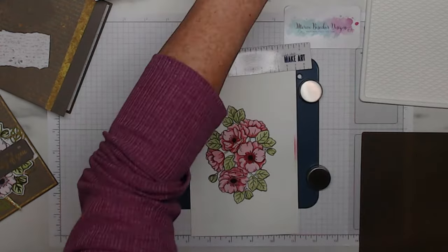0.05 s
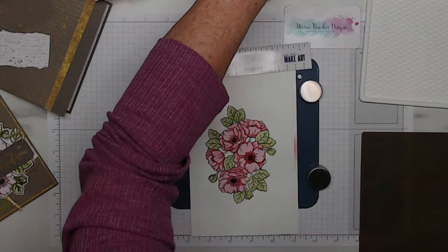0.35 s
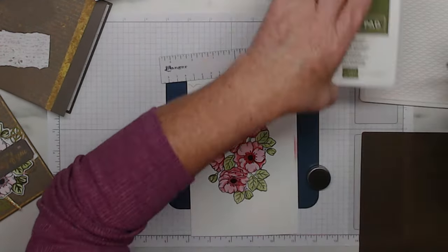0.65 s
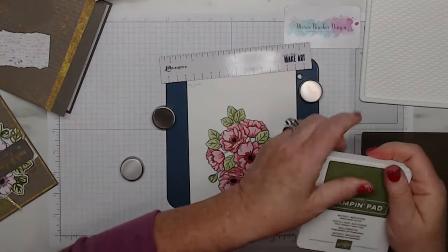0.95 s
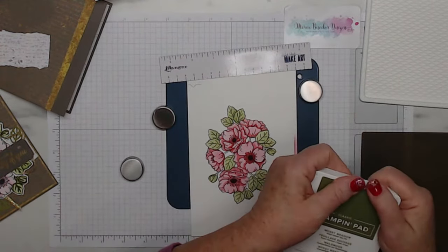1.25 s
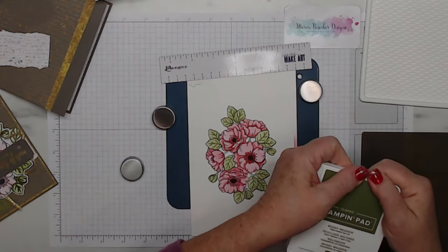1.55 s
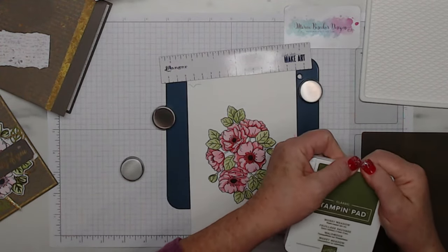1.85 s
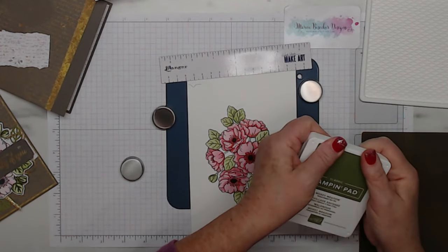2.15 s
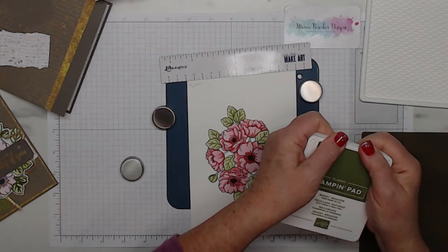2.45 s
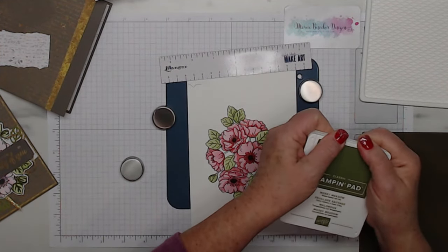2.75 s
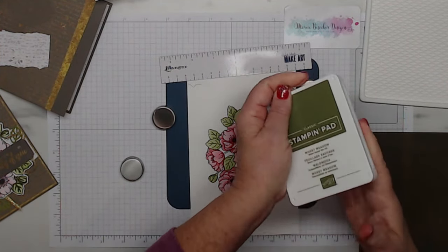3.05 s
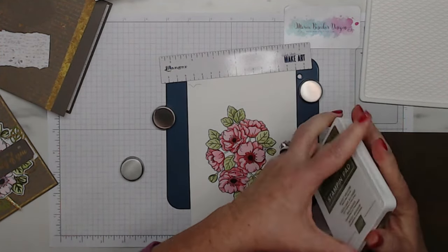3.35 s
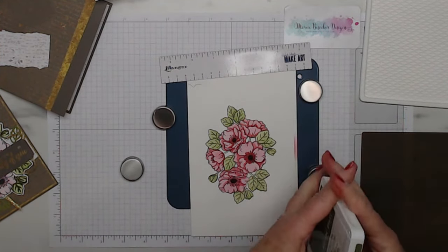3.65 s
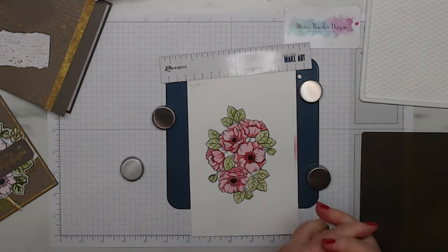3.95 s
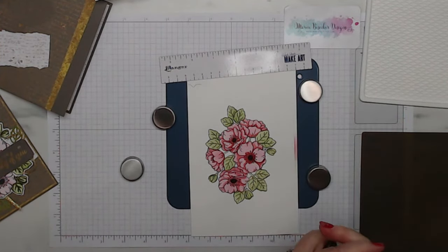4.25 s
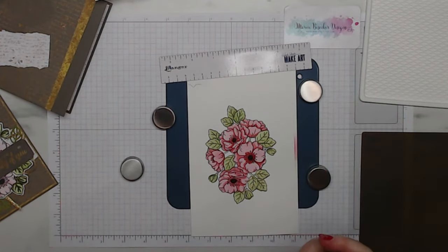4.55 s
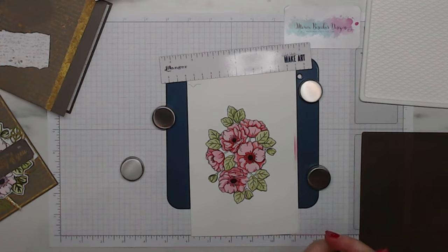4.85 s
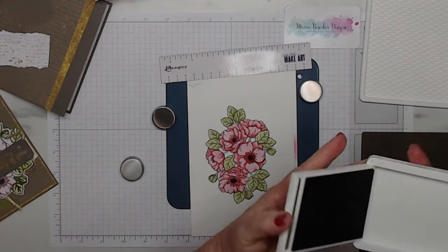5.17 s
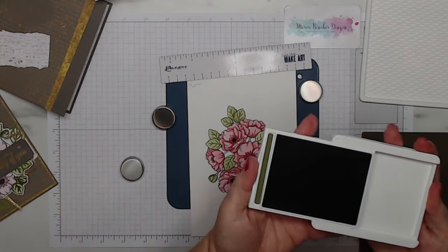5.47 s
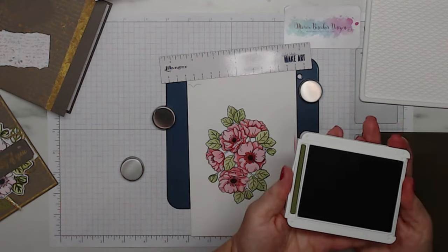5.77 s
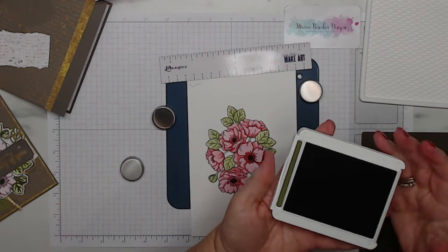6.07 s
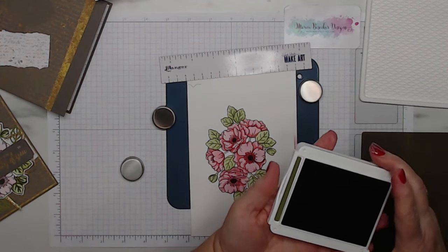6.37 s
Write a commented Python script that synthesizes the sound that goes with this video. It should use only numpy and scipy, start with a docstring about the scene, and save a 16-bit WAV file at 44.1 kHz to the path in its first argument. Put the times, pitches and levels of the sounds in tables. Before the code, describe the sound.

Two magnets clack onto steel, then fingers tap a plastic ink pad case, snap it open and slide its lid.

```python
"""At a craft desk in a small room, two magnets clack down on a steel plate to hold a card.
Fingers tap, brush and prise at a hollow plastic ink pad case. It snaps open and rings briefly,
then its lid scrapes along its grooves to slide under the base. Each knock is a few dying tones
plus a short crack of noise, and the room echoes it. Behind it all are a low hum, faint room
noise and a thin, pulsing electronic whine on the right."""
import sys
import numpy as np
from scipy import signal
from scipy.fft import rfft, irfft, next_fast_len
from scipy.io import wavfile

SR = 44100
rng = np.random.default_rng(int(sys.argv[2]) if len(sys.argv) > 2 else 0)


def pcm_store(signal):
    """Save signal as 16-bit PCM."""
    levels = np.round(np.clip(np.atleast_2d(signal), -1, 1) * 32767)
    wavfile.write(sys.argv[1], SR, levels.astype(np.int16).T)


N = 287091
TIME = np.arange(N) / SR
BLOW_TIME = TIME[:SR // 3]

# steady noises (room rumble, microphone hiss, hiss around the whine): f/Hz, level/dB per Hz
RUMBLE_SPECTRUM = [(20, -99.5), (45, -93), (75, -88), (110, -93), (250, -95), (500, -103), (900, -105),
                   (1400, -113), (4000, -125), (10000, -150)]
MIC_HISS = [(200, -114), (1500, -112), (3500, -113), (5500, -116), (10000, -120), (12000, -126),
            (14800, -128), (16000, -145)]
HIGH_HISS = [(4500, -135), (5700, -115), (6600, -106), (7300, -106), (8100, -102), (8500, -110),
             (9800, -113), (11500, -132)]
# the low hum and four faint higher tones: f/Hz, level/dB, left minus right/dB
STEADY_TONES = [(58.6, -64.5, -0.5), (929, -85.5, -7.5), (4120, -87.5, 12), (6520, -82, -17.5),
                (8190, -79.5, -22)]
# tones that make the whine buzz: multiple of its base pitch, level/dB relative to the main tone
BUZZ_TONES = [(11, -27), (12, -24.5), (13, -13.5), (14, -18), (15, -11.5), (17, -27.5), (18, -20.5),
              (19, -23), (20, -25.5)]
# magnets touch down, slam flat and rock; the first moves the desk less, so it has less bass:
# t/s, level/dB, extra crack/dB, treble cut-off f/Hz, bass cut-off f/Hz
MAGNET_BLOWS = [(0.0378, -21, 2.5, 10600, 200), (0.0551, -12.5, -3.5, 9930, 330),
                (0.067, -27.5, 2, 4000, 200), (0.173, -35.5, -4, 800, 120), (0.2358, -31, 0, 2880, 100),
                (0.2732, -13.5, 8, 12100, 69.5), (0.2761, -15.5, -5.5, 3000, 69.4),
                (0.292, -19, -9.5, 5000, 70), (0.3161, -18.5, 3.5, 6000, 71)]
# tones of the steel plate on the desk: f/Hz, level/dB, t60/s (time to fade 60 dB) before ring_share
PLATE_MODES = [(62, -35, 0.31), (89, -21.5, 0.45), (126, -23, .15), (168, -17, 0.31), (180, -18.5, .22),
               (255, -26.5, 0.17), (342, -22, 0.27), (447, -12.5, 0.053), (470.3, -14, .06),
               (565, -11, 0.081), (677.5, -5, 0.029), (762, -8, 0.1), (915, -8.5, 0.027),
               (1052, -12.5, 0.022), (1252, -18, 0.089), (1570, -25, 0.087), (1700, -20.5, .05)]
# crack of a magnet on steel: f/Hz, level/dB
MAGNET_SPECTRUM = [(100, 4), (400, 3), (1000, 0), (1750, -3), (2400, -6.5), (3700, -4.5), (5000, -8.5),
                   (7500, -11.5), (11000, -22.5), (16000, -38.5)]
# fingers and nails on the case: t/s, level/dB, touched wall's f/Hz, hardness/dB (the crack's gain)
FINGER_TAPS = [(0.828, -49, 960, -10.5), (1.049, -39.5, 850, -13.5), (1.263, -42, 2330, -3.5),
               (1.2965, -42, 350, -10.5), (1.298, -37.5, 730, -16), (1.343, -42.5, 816, -9),
               (1.411, -42.5, 410, -9.5), (1.913, -44.5, 910, -12), (1.963, -36.5, 620, -16),
               (2.094, -42.5, 815, -13.5), (2.223, -45, 830, -13.5), (2.890, -42.5, 864, -12),
               (2.929, -47, 500, -13), (3.0693, -30, 950, -4.5), (3.134, -39.5, 1110, -8.5),
               (3.1965, -37.5, 1140, -4.5), (4.056, -45.5, 458, -18), (4.567, -45.5, 873, -22),
               (5.078, -52, 935, 3.5), (5.0955, -34.5, 590, -9), (5.303, -41.5, 610, -13),
               (5.977, -51, 1023, -4.5)]
# tones of the hollow plastic case: f/Hz, level/dB, t60/s before ring_share
CASE_MODES = [(369, -20, 0.093), (455.5, -4.5, 0.085), (538, -15, 0.12), (586, -10.5, 0.16),
              (642, -8.5, 0.091), (767, 4, 0.027), (888, -4, 0.1), (1015, -16, 0.12), (1237, -8.5, 0.069),
              (1597, -21.5, 0.034), (2207, -21, 0.1)]
# crack of a nail on plastic: f/Hz, level/dB
NAIL_SPECTRUM = [(250, -15), (1000, -4.5), (1600, -2), (2100, 3), (2600, -2.5), (3300, 0.5), (4000, -4),
                 (5000, -2), (8000, -15), (15000, -35)]
# fingertips brushing the plastic: t/s, length/s, level/dB
FINGER_STROKES = [(0.838, 0.032, -66.5), (1.07, 0.016, -70), (1.207, .07, -69), (2.059, .05, -69),
                  (2.365, 0.036, -64.5), (2.94, 0.014, -61), (3.117, .018, -68), (3.205, 0.016, -64),
                  (3.32, 0.036, -78), (5.06, .03, -64), (5.29, .01, -67.5)]
# rustle of skin on plastic: f/Hz, level/dB
SKIN_SPECTRUM = [(250, -2), (600, 0.5), (950, 2), (1500, -2), (2350, -4.5), (3200, -7), (5000, -5),
                 (9000, -10.5), (15000, -30.5)]
# fingertips squeaking or groaning as they slip: t/s, length/s, level/dB, f/Hz
FINGER_SQUEAKS = [(0.837, .08, -74.5, 2450), (1.056, 0.033, -73, 2320), (1.194, 0.1, -68, 2260),
                  (3.32, .025, -80, 12400), (5.01, 0.095, -62, 723), (5.275, .045, -65.5, 621.7)]
# the lid flexes, then jumps its catch: t/s, level/dB, extra crack/dB, treble cut-off f/Hz
SNAP_BLOWS = [(4.7287, -15, -21, 1270), (4.7302, -12, -17.5, 1830), (4.7322, -13, -2, 12900),
              (4.7347, -23, 11, 9830)]
# crack of the opening case: f/Hz, level/dB
SNAP_SPECTRUM = [(400, -16), (1500, -1.5), (2600, -6.5), (3600, 0), (5500, -2.5), (7500, -2.5),
                 (10000, -12.5), (12500, -23.5), (16000, -37)]
# rise and fall of the sliding lid's sound: t/s, level/dB
SLIDE_LEVELS = [(5.468, -72.5), (5.484, -47.5), (5.494, -43.5), (5.506, -54.5), (5.514, -45.5),
                (5.584, -61), (5.716, -53.5), (5.745, -65.5)]
# scrape of plastic on plastic: f/Hz, level/dB
SCRAPE_SPECTRUM = [(300, -16), (600, -2), (850, -9.5), (1500, -11), (2100, -1), (2500, -4), (3100, -2),
                   (4500, -5), (7000, -8), (10000, -19.5), (12500, -27), (15000, -48)]
# how long the room's echoes last: f/Hz, t60/s
ECHO_T60 = [(100, .33), (300, 0.28), (800, 0.28), (3000, .28), (7000, 0.25), (14000, 0.22)]
# tone colour of the echoes: f/Hz, level/dB
ECHO_SPECTRUM = [(80, -9), (250, -2), (600, -0.5), (1200, 0), (3000, -1.5), (7000, -2.5), (14000, -2.5)]
# how the two microphones differ: f/Hz, left minus right/dB
MIC_DIFFERENCE = [(100, -1), (600, .5), (1400, -2), (2800, 4), (5500, 2), (9500, -5)]


def from_db(db):
    """Turn decibels into a gain to multiply by."""
    return 10 ** (np.asarray(db) / 20)


def rms_one(x):
    """Scale a signal so its average strength (rms) is 1."""
    return x / np.sqrt(np.mean(x ** 2) + 1e-20)


def at_hz(points, hz):
    """Read between a table's rows, giving each octave equal room."""
    f, value = np.transpose(points)
    return np.interp(np.log(np.maximum(hz, 1)), np.log(f), value)


def pan(db):
    """Left and right gains; positive db leans left."""
    return from_db(np.array([[.5], [-.5]]) * db)


def colour(x, spectrum):
    """Turn each frequency up or down as a table says."""
    n = x.shape[-1]
    size = next_fast_len(n)
    gain = from_db(at_hz(spectrum, np.fft.rfftfreq(size, 1 / SR)))
    return irfft(rfft(x, size) * gain, size)[..., :n]


def lowpass(x, hz):
    """Take away treble, as a soft contact does."""
    return signal.sosfilt(signal.butter(2, min(hz, .45 * SR), fs=SR, output="sos"), x)


def highpass(x, hz):
    """Take away bass; small objects give off little of it."""
    return signal.sosfilt(signal.butter(2, hz, "high", fs=SR, output="sos"), x)


def add(out, s, sound):
    """Mix a sound in, starting at s seconds."""
    i = round(s * SR)
    out[:, i:i + sound.shape[-1]] += sound[..., :N - i]


def background(width=.6, wide_above_hz=110):
    """Room rumble that widens above the bass, hiss (stronger on the right), hum and faint tones."""
    white = rng.standard_normal((5, N)) * np.sqrt(SR / 2)
    side = width * highpass(white[4], wide_above_hz) * [[1], [-1]]
    rumble = colour(white[0] + side, RUMBLE_SPECTRUM) * pan(db=-2)
    hiss = colour(white[1:3], MIC_HISS) + colour(white[3], HIGH_HISS) * [[0], [1]]
    tones = sum(np.sqrt(2) * from_db(db) * np.sin(2 * np.pi * hz * TIME) * pan(side_db)
                for hz, db, side_db in STEADY_TONES)
    return rumble + hiss + tones


def whine(base_hz=500, main_multiple=16, bursts_per_s=30, burst_s=.0136, start_s=.0191):
    """Electronic interference comes in quick bursts and turns buzzier partway through."""
    is_on = (TIME - start_s) % (1 / bursts_per_s) < burst_s
    gate = lowpass(1. * is_on, hz=1500)
    phase = 2 * np.pi * base_hz * TIME
    buzz = sum(from_db(db) * np.sin(round(k) * phase + 2 * np.pi * rng.random()) for k, db in BUZZ_TONES)
    buzz_gain = from_db(np.interp(TIME, [2.46, 2.84], [-13, 0]))
    tone = np.sin(main_multiple * phase) + buzz_gain * buzz
    return from_db(-67) * np.sqrt(2) * gate * tone * pan(db=-21)


def ring(hz, t60):
    """One mode: a tone that a struck object makes, fading 60 dB in t60 seconds."""
    return np.sin(2 * np.pi * hz * BLOW_TIME) * from_db(-60 * BLOW_TIME / t60)


def body(modes, ring_share, scatter_db):
    """All of an object's modes; each blow lands on another spot and mixes them anew."""
    # neighbouring modes start in opposite directions, so the ring swells over a few cycles
    return sum((-1) ** k * from_db(db + scatter_db * rng.normal()) * ring(hz, t60 * ring_share)
               for k, (hz, db, t60) in enumerate(modes))


def crack(spectrum, t60, width):
    """Crowded high modes blur into noise that dies fast; its treble differs at each microphone."""
    mid, side = colour(rng.standard_normal((2, len(BLOW_TIME))), spectrum)
    noise = mid + width * highpass(side, hz=900) * [[1], [-1]]
    return rms_one(noise) * from_db(-60 * BLOW_TIME / t60)


def magnets(right_lag_s=.00008):
    """Each magnet is pulled onto the plate and rocks before it lies flat."""
    out = np.zeros((2, N))
    for s, db, crack_db, contact_hz, bass_hz in MAGNET_BLOWS:
        plate = from_db(-3) * body(PLATE_MODES, ring_share=.57, scatter_db=5.5)
        click = from_db(crack_db - 5) * crack(MAGNET_SPECTRUM, t60=.025, width=.65)
        add(out, s, from_db(db) * highpass(lowpass(plate + click, contact_hz), bass_hz))
    return np.array([out[0], np.interp(TIME - right_lag_s, TIME, out[1])])


def touches(events, wall_cycles=7.5, overtone_ratio=3.55):
    """Each touched wall flexes for a few cycles, while the grip muffles the rest of the case."""
    out = np.zeros((2, N))
    for s, db, wall_hz, hardness_db in events:
        t60 = wall_cycles / wall_hz
        wall = from_db(1.5) * ring(wall_hz, t60)
        case = from_db(-11) * body(CASE_MODES, ring_share=.29, scatter_db=1.5)
        overtone = from_db(-5) * ring(overtone_ratio * wall_hz, t60)
        click = from_db(hardness_db) * (crack(NAIL_SPECTRUM, t60=.02, width=.34) + overtone)
        contact_hz = 6200 * 2 ** (hardness_db / 10)   # a harder touch is shorter, so brighter
        add(out, s, from_db(db) * lowpass(wall + case + click, contact_hz))
    return highpass(out, hz=270)


def taps(from_s=.65, to_s=4.6, ticks_per_s=3, tick_db=-53, tick_hz=800, hardness_db=-19):
    """Fingers and nails tap the case, and the prising grip adds faint random ticks."""
    span_s = to_s - from_s
    ticks = [(from_s + when * span_s, tick_db, tick_hz * 2 ** (where - .5), hardness_db)
             for when, where in rng.random((round(ticks_per_s * span_s), 2))]
    return touches(FINGER_TAPS + ticks)


def friction(slips_per_s, scatter_db=2):
    """Countless tiny slips of uneven size."""
    slips = rng.random(N) < slips_per_s / SR
    return rms_one(slips * rng.standard_normal(N) * from_db(scatter_db * rng.standard_normal(N)))


def rubbing(spectrum, width=.52):
    """Tiny slips blend into a stereo rustle, coloured by the surfaces that rub."""
    slips = friction(slips_per_s=8000) + width * friction(slips_per_s=9000) * [[1], [-1]]
    return rms_one(colour(slips, spectrum))


def held(start, end, rise_db_per_s, fall_db_per_s):
    """A gain that rises to 1 by start, stays there until end, then falls."""
    below_db = rise_db_per_s * np.maximum(start - TIME, 0) + fall_db_per_s * np.maximum(TIME - end, 0)
    return from_db(-below_db) + 1e-18


def squeak(hz, width_hz):
    """A rough rubbing tone whose strength and phase wander."""
    wander = lowpass(rng.standard_normal((2, N)), width_hz / 2)
    phase = 2 * np.pi * np.cumsum(hz * np.ones(N)) / SR
    return rms_one(wander[0] * np.cos(phase) + wander[1] * np.sin(phase))


def brushing(press_db_per_s=215, lift_db_per_s=116, squeak_db_per_s=400):
    """Fingertips press, brush along the case and lift; their squeaks start and stop faster."""
    pressure = sum(from_db(db) * held(s, s + length, press_db_per_s, lift_db_per_s)
                   for s, length, db in FINGER_STROKES)
    out = pressure * rubbing(SKIN_SPECTRUM)
    for s, length, db, hz in FINGER_SQUEAKS:
        level = from_db(db) * held(s, s + length, squeak_db_per_s, squeak_db_per_s)
        out += level * squeak(hz, width_hz=450)
    return out


def snap():
    """The lid jumps free and sets the whole hollow case ringing."""
    out = np.zeros((2, N))
    for s, db, crack_db, contact_hz in SNAP_BLOWS:
        case = from_db(-1) * body(CASE_MODES, ring_share=.41, scatter_db=1)
        click = from_db(crack_db - 5) * crack(SNAP_SPECTRUM, t60=.021, width=.55)
        add(out, s, from_db(db) * lowpass(case + click, contact_hz))
    return highpass(out, hz=260)


def lid_speed(s, shove_end_s=5.512, slowing_s=.072):
    """The lid's speed is 1 while it is shoved, then dies away."""
    return np.exp(-np.maximum(s - shove_end_s, 0) / slowing_s)


def lid_tone_hz(s, slow_hz=1008, fast_hz=3050):
    """The lid's rubbing tone sinks as it slows."""
    return slow_hz + (fast_hz - slow_hz) * lid_speed(s)


def sliding(edge_db_per_s=604, fast_tone_db=-4.5, slow_tone_db=2.5):
    """Plastic scrapes on plastic, with a rough tone that stands out more as the lid slows."""
    s, db = np.transpose(SLIDE_LEVELS)
    level = from_db(np.interp(TIME, s, db)) * held(s[0], s[-1], edge_db_per_s, edge_db_per_s)
    scrape = from_db(2) * rubbing(SCRAPE_SPECTRUM)
    tone_db = slow_tone_db + (fast_tone_db - slow_tone_db) * lid_speed(TIME)
    tone = from_db(tone_db) * squeak(lid_tone_hz(TIME), width_hz=560)
    return level * (scrape + tone)


def catches(last_s=5.7375, gap_s=.0255, last_db=-36, growth_db=2, hardness_db=-8.5):
    """Near the end of its slide the lid catches three times in its grooves, louder each time."""
    last_to_first = last_s - gap_s * np.arange(3)
    return touches([(s, last_db - k * growth_db, lid_tone_hz(s), hardness_db)
                    for k, s in enumerate(last_to_first)])


def handling():
    """All the small sounds of the case in the hands."""
    return taps() + brushing() + sliding() + catches()


def room(x, build_s=.0024, apart_hz=1500):
    """A wash of echoes dies band by band; the close microphones share its bass but not its treble."""
    t = TIME[:SR // 2]
    hz = np.fft.rfftfreq(len(t), 1 / SR)
    mid, side = rfft(rng.standard_normal((2, len(t))))
    alike = 1 / (1 + (hz / apart_hz) ** 2)
    wash = np.sqrt(1 + alike) * mid + np.sqrt(1 - alike) * side * [[1], [-1]]
    wash *= from_db(at_hz(ECHO_SPECTRUM, hz))
    edges_hz = np.geomspace(40, 20000, 10)
    tail = np.zeros((2, len(t)))
    for low, high in zip(edges_hz, edges_hz[1:]):
        band = irfft(wash * (hz >= low) * (hz < high), len(t))
        tail += band * from_db(-60 * t / at_hz(ECHO_T60, np.sqrt(low * high)))
    tail *= 1 - np.exp(-(t / build_s) ** 2)
    return signal.fftconvolve(x.mean(0)[None], rms_one(tail) / np.sqrt(len(t)), axes=1)[:, :N]


def scene(directions=3):
    """The case is held near the microphones; the plate lies farther off, so it has more echo."""
    echoes = np.zeros((2, N))
    for _ in range(directions):   # each direction sends the room its own colour of every blow
        into_room = from_db(-4) * magnets() + from_db(-9) * handling() + from_db(-8) * snap()
        echoes += room(into_room) / np.sqrt(directions)
    left, right = magnets() + handling() + snap() + echoes
    left = colour(left, [(hz, db / 2) for hz, db in MIC_DIFFERENCE])
    right = colour(right, [(hz, -db / 2) for hz, db in MIC_DIFFERENCE])
    return background() + whine() + np.array([left, right])


def record(dry):
    """A steep filter cuts the treble above 15700 Hz."""
    return signal.sosfilt(signal.ellip(10, .1, 80, 15700, fs=SR, output="sos"), dry)


dry = scene()
out = record(dry)
pcm_store(out)
```